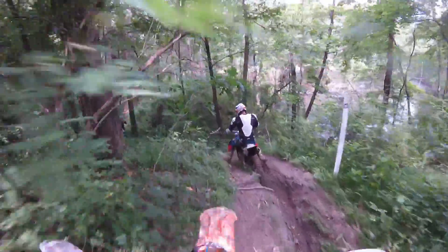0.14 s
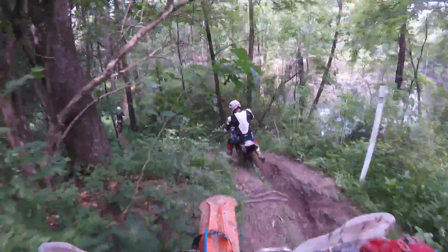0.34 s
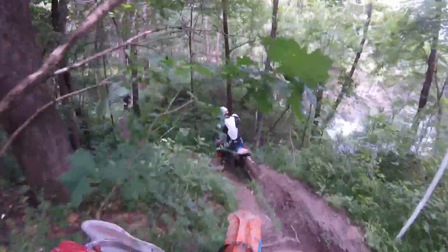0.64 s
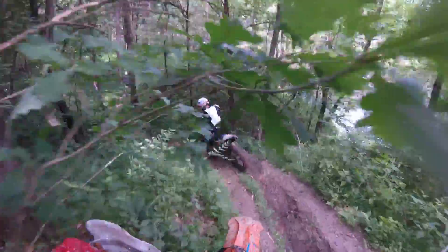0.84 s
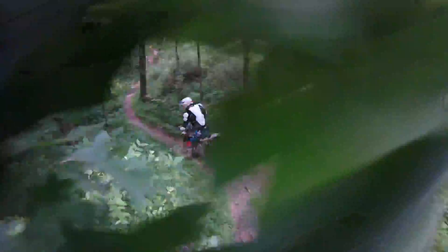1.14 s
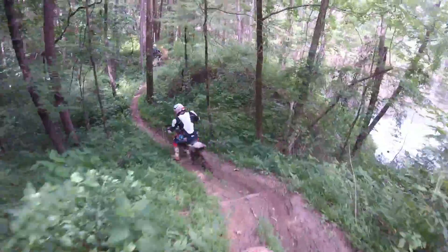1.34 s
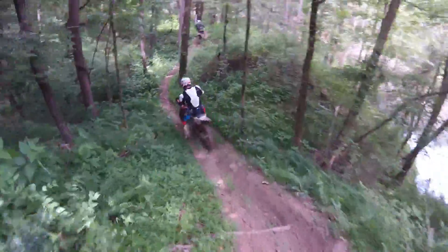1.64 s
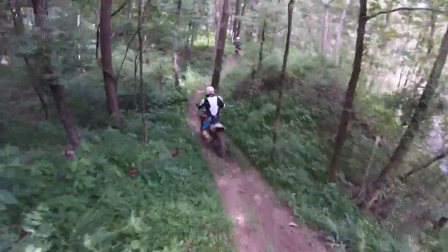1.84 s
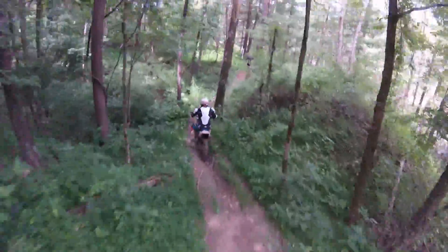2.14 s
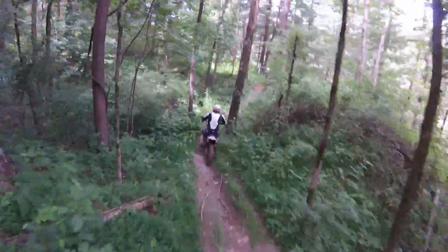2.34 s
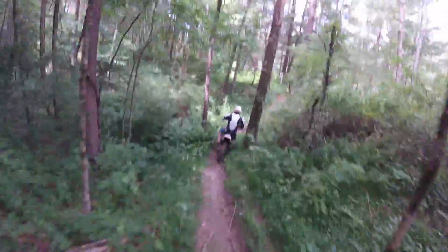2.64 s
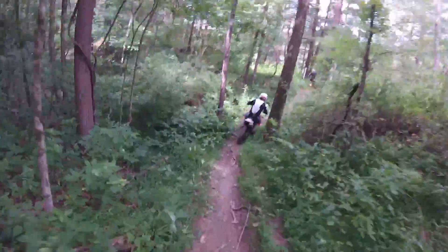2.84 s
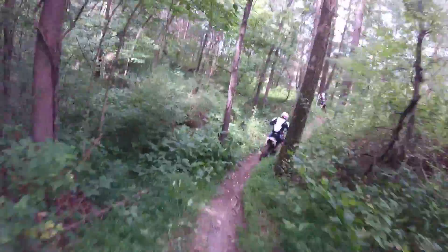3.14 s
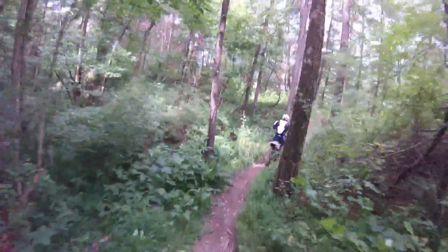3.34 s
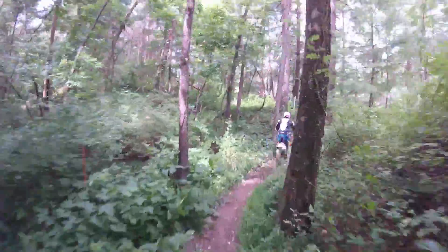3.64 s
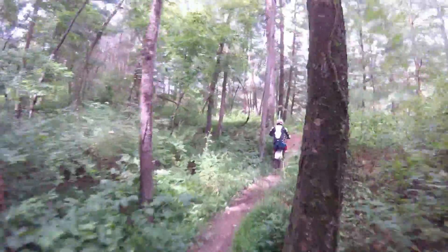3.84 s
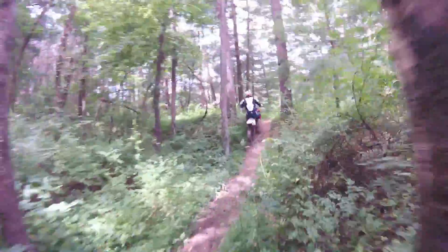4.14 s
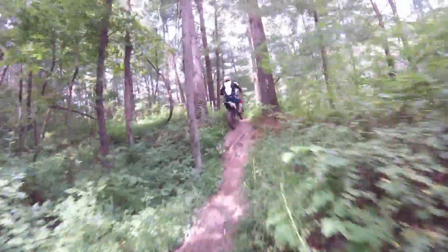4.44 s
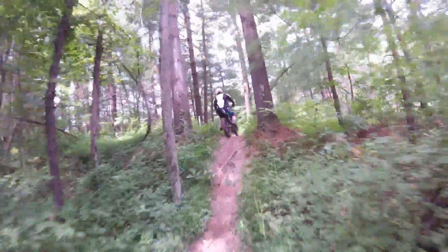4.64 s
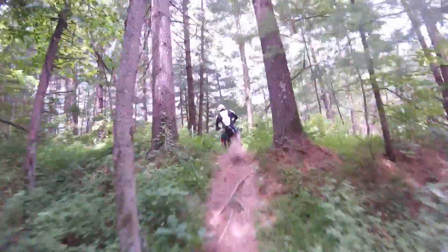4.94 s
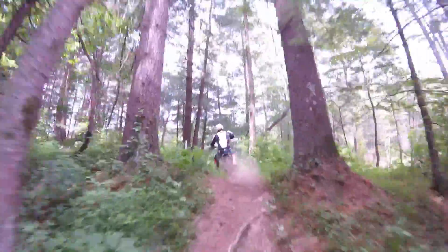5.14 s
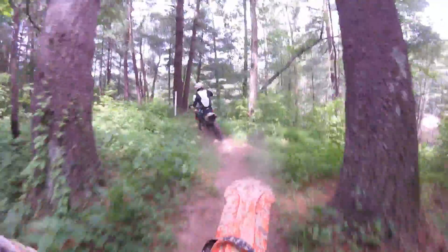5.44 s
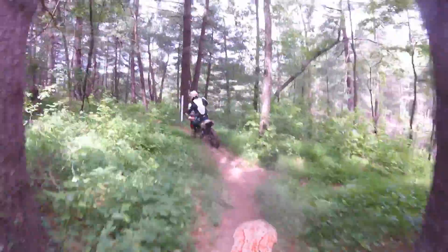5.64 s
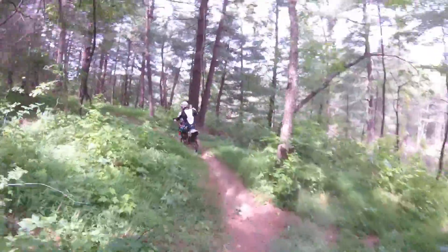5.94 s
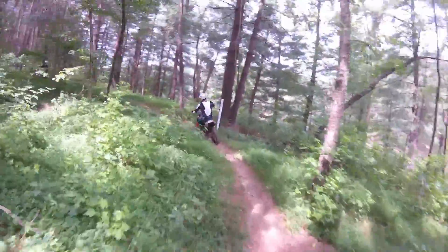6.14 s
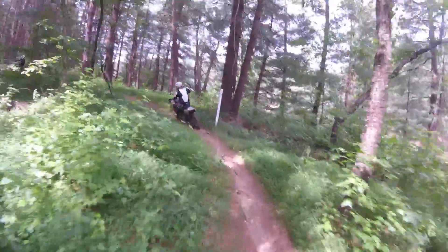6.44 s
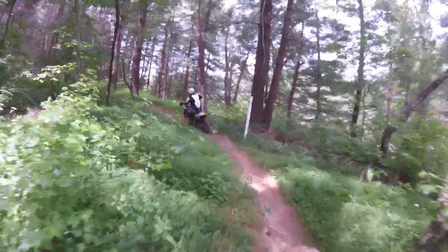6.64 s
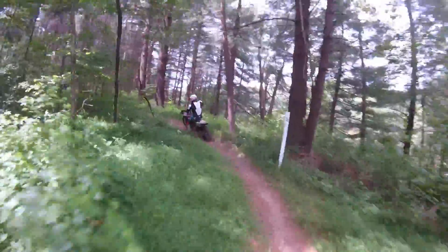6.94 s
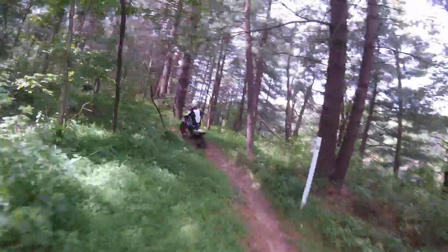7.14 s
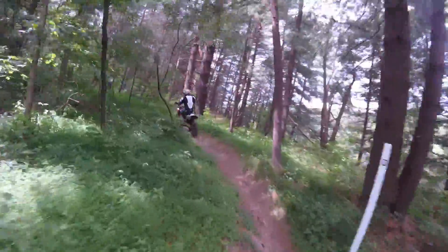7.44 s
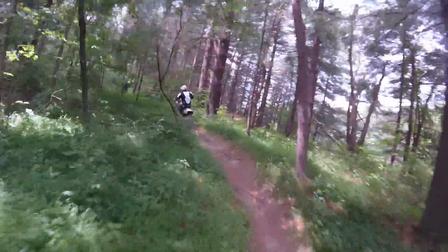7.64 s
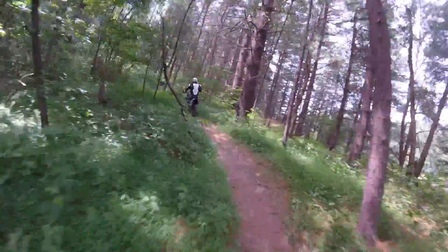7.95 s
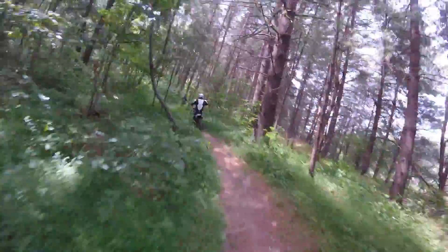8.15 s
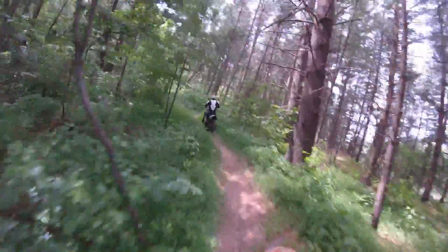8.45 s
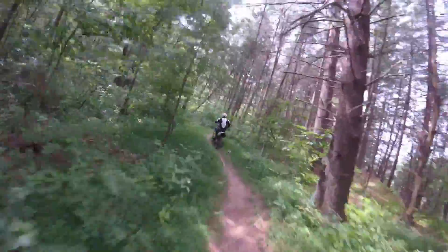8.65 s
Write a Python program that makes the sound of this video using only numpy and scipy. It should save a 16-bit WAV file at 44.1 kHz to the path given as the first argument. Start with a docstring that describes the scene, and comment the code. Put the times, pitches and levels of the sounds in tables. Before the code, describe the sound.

Dirt bikes putter and rev in short bursts while leaves slap a helmet microphone over low wind rumble and thumps.

```python
"""A dirt bike revs in bursts just ahead on a forest trail, its exhaust aimed back at a helmet camera.
Each firing is a pulse coloured by the pipe: it sings on open throttle and putters when coasting.
Close up, the rider's own two-stroke rattles once a turn and pops at idle. Leaves and twigs slap
the helmet and ring the camera's closed housing. Underneath, trail bumps and wind gusts buffet
the helmet with low thumps and shake the housing's membrane at its low resonance."""
import sys
import numpy as np
from scipy import signal
from scipy.fft import rfft, irfft, next_fast_len
from scipy.io import wavfile
from scipy.ndimage import uniform_filter1d, map_coordinates

SR = 44100
rng = np.random.default_rng(int(sys.argv[2]) if len(sys.argv) > 2 else 0)


def log_audio(samples):
    """Write samples as a 16-bit WAV file to the path given in sys.argv[1]."""
    # one column per channel
    frames = np.atleast_2d(samples).T
    # limit to full scale, then quantise
    limited = np.clip(frames, -1, 1)
    pcm = np.round(limited * 32767).astype(np.int16)
    wavfile.write(sys.argv[1], SR, pcm)


N = 387638

# Engine speed of the bike ahead: time_s, turns_per_s
AHEAD_SPEED = [(3.2, 44), (4, 44), (4.1, 48), (4.24, 62.3), (4.3, 65), (4.41, 64.5), (4.56, 52), (4.64, 50),
               (4.72, 54), (4.8, 67), (4.88, 70.8), (4.98, 69.1), (5.07, 63.5), (5.13, 63.4), (5.3, 46),
               (5.62, 48), (5.72, 60.6), (5.8, 69), (5.87, 71), (5.96, 79.3), (6.04, 60), (6.1, 50),
               (6.2, 51), (6.27, 57.2), (6.37, 56.8), (6.52, 65.2), (6.58, 65.7), (6.66, 63.3), (6.76, 58),
               (6.92, 46), (7.05, 55), (7.12, 50), (7.38, 45), (7.5, 58.5), (7.56, 62.6), (7.66, 64.5),
               (7.8, 64), (7.86, 62.4), (8.06, 49.4), (8.19, 52.4), (8.27, 45), (8.55, 63.2), (8.62, 65.3),
               (8.79, 52)]
# Its throttle bursts: open_s, shut_s, opening_0_to_1, level_db, turned_aside_0_to_1
BURSTS = [(3.174, 3.448, 0, -46, 0.02), (3.837, 4.1, 0.53, -33.5, 0.01), (4.35, 4.67, 0.42, -34, 0.18),
          (4.025, 4.359, 0.79, -25, 0), (4.562, 5.133, 1, -29.5, 0.12), (5.515, 5.712, 0.95, -27, 0),
          (5.705, 6.04, 0.78, -31.5, 0.95), (6.057, 6.81, 0.94, -30, 0), (6.827, 7.006, 0.5, -31.5, 0.01),
          (7.29, 7.89, 0.74, -28.5, 0), (7.872, 8.12, 0.7, -30, 0.01), (8.26, 8.58, 0.76, -27, 0.01)]
# Harmonics that sing on open throttle: harmonic, level_db
SINGING_HARMONICS = [(4, -6), (8, -14), (11, -20)]
# Its exhaust head-on, turned aside, as a hollow putter and as a bright rasp: frequency_hz, gain_db
PIPE_EQ = [(50, -44), (130, -13.5), (200, -2), (260, 9), (325, 3.5), (380, -15.5), (450, -13), (520, 0),
           (600, -14), (720, -11), (850, -19), (1050, -13), (1350, -10), (1500, -30), (1700, -24),
           (4000, -120)]
ASIDE_EQ = [(50, -23), (150, 8), (200, -14), (238, 13), (300, -11), (400, 5.5), (500, -1), (700, 3.5),
            (900, -40), (1200, -9.5), (1500, -46), (4000, -120)]
PUTTER_EQ = [(300, -40.5), (520, 3.5), (650, 25.5), (800, -53.5), (1500, -35.5), (4000, -120)]
RASP_EQ = [(700, -14), (1100, -8), (1500, -8), (2000, -1.5), (9000, -2.5)]

# The rider's own engine: time_s, turns_per_s, rattle_db, hum_db
OWN_ENGINE = [(0, 33, -51.5, -58), (1.15, 25, -55, -74), (1.35, 24, -67.5, -99.5), (1.6, 22.6, -68, -80.5),
              (2.2, 33, -56, -61), (2.45, 30, -53, -80), (2.75, 27, -57.5, -65), (3.2, 38, -59.5, -83),
              (3.3, 51, -58.5, -64), (3.4, 58, -52.5, -53), (3.65, 62, -51, -45.5), (3.77, 69, -49.5, -68),
              (3.9, 63, -52.5, -71), (4.6, 52, -45.5, -68), (4.8, 64, -41, -73), (5.16, 56, -47, -65),
              (5.25, 45, -56.5, -73), (5.38, 50, -54.5, -55), (5.45, 54, -51.5, -43.5),
              (5.58, 62.6, -46.5, -34.5), (5.85, 61, -39.5, -30), (6.1, 64, -49.5, -36.5),
              (6.55, 65, -43.5, -32), (6.93, 54, -48.5, -49), (7.02, 62, -44, -37), (7.1, 68, -42, -39),
              (7.2, 72, -42.5, -40), (7.4, 71, -43.5, -64), (7.48, 72, -43, -26), (7.53, 90, -40.5, -39),
              (7.58, 98, -36.5, -52), (7.64, 72, -41, -74), (8.45, 70, -49, -30), (8.67, 65, -46.5, -42.5),
              (8.79, 62, -63, -55)]
# Its exhaust hum: harmonic, level_db
HUM_HARMONICS = [(1, -8), (2, -6), (3, -2), (4, 0), (5, -10), (6, -12), (8, -12), (9, -12), (12, -14)]
# Firings that catch at idle: start_s, level_db
IDLE_POPS = [(0.069, -22), (0.426, -11.5), (0.616, -11), (0.796, -16), (1.443, -31), (1.615, -26),
             (1.778, -26), (1.972, -18), (2.128, -25.5), (2.293, -19), (2.455, -15.5), (2.647, -13),
             (2.83, -23), (2.994, -14.5)]
# Its frame drone and its dull, mid and sizzling rattle: frequency_hz, gain_db
FRAME_EQ = [(60, -29.5), (120, -5), (350, 2.5), (620, -15), (850, -9.5), (1300, -49.5), (3000, -120)]
DULL_EQ = [(600, -21), (1000, -17), (1500, -14), (2000, -15), (2500, -29), (4200, -21), (15000, -20)]
MID_EQ = [(1500, -4.5), (2000, -12)]
SIZZLE_EQ = [(2000, -25), (5000, 16.5), (13000, 15)]

# Leaves and twigs hitting the helmet: start_s, level_db, centre_hz
LEAF_SLAPS = [(0.142, -19, 2590), (0.23, -16.5, 1360), (0.249, 4.5, 2140), (0.278, -32, 2390),
              (0.294, 0, 1560), (0.361, -18, 1310), (0.739, -5.5, 1920), (0.768, -12.5, 2880),
              (0.961, 12.5, 3240), (0.966, -11, 2600), (0.973, -7, 2560), (0.983, -8, 1900),
              (0.991, 3, 2030), (1.05, -9, 1517), (1.056, -1.5, 1830), (1.062, 13.5, 3850),
              (1.069, 3.5, 3640), (1.083, -0.5, 2280), (1.099, -7.5, 2970), (1.11, -26.5, 2590),
              (1.159, -3.5, 5000), (1.168, -5.5, 3720), (1.189, -4, 3320), (1.195, -7, 3240),
              (1.214, 11, 2810), (1.731, -23.5, 1420), (2.014, -17.5, 3480), (2.21, -25.5, 1180),
              (2.266, -0.5, 3180), (2.638, -21, 3000), (2.672, -16, 2730), (2.711, -3, 3300),
              (2.882, -25, 2610), (2.92, -16, 1320), (2.954, -20.5, 1010), (2.993, -19, 2770),
              (3.041, -22.5, 780), (3.064, -22, 1090), (3.08, -7, 2000), (3.091, -21, 1980),
              (3.117, -22.5, 2390), (4.079, -19.5, 960), (5.189, -6, 1540), (5.227, -6, 1670),
              (5.288, -28, 1390), (5.304, -19, 1480), (5.316, -22, 1400), (5.363, -13, 1580),
              (6.116, -1.5, 2870), (7.28, -9, 2880)]
# Leaves dragging along it: start_s, length_s, level_db, centre_hz
LEAF_DRAGS = [(0.225, 0.03, -19.5, 1470), (0.268, 0.029, -21.5, 1900), (0.949, 0.047, -23.5, 2640),
              (1.034, 0.061, -34.5, 2450), (1.1, 0.029, -21, 2900), (1.163, 0.078, -26.5, 3300),
              (1.209, 0.12, -43, 2400), (3.005, 0.045, -34, 2900)]
# Resonances of the struck housing: pitch_hz, width_hz, level_db
SHELL_MODES = [(1206, 81, -0.5), (2040, 1100, -6), (1960, 88, -6), (2450, 250, -0.5), (2900, 820, -7.5),
               (3560, 284, -1), (4080, 87, -6.5), (5020, 280, -8), (5600, 370, -10.5), (7900, 2300, -21),
               (9600, 1600, -28), (12900, 730, -25.5)]
# The housing's boxy colour on bright engine noise, and its thud when hit: frequency_hz, gain_db
HOUSING_EQ = [(500, -4), (950, -8), (1380, -1.5), (1600, -22.5), (2000, -18), (2450, 1), (2900, -3),
              (3450, 1.5), (3950, -15.5), (4550, -19.5), (4890, -9.5), (5300, -19.5), (5850, -16.5),
              (6300, -21), (7700, -24), (9000, -34.5), (9900, -32), (11200, -42), (13000, -37.5),
              (15500, -84)]
THUD_EQ = [(100, 13), (500, 1.5), (1000, -1), (1600, -6.5), (2200, -4.5), (5000, -6), (15500, -28.5)]

# Trail bumps and short wind gusts buffeting the helmet: start_s, thump_db, rumble_swell_db
BUFFETS = [(0.232, -30, -15), (0.549, -55, -1.5), (0.981, -33, -5.5), (1.049, -15, -10), (1.779, -54, -17),
           (2.054, -42, -24), (2.279, -35.5, -13), (2.5, -54, -9), (2.671, -13.5, 2), (2.746, -30, -3.5),
           (3.06, -12.5, 7), (3.748, -52, -9), (4.072, -40, -2.5), (4.338, -10, 4), (4.58, -24, -9),
           (5.09, -18.5, -10.5), (5.214, -11, 2), (5.321, -39, -4.5), (5.805, -40, -42), (6.095, -17.5, -4),
           (6.948, -51, -2), (7.648, -18, -13), (7.888, -21, 0), (8.352, -35, 4), (8.703, -22, 5)]
# Wind on the housing: time_s, level_db
WIND_LEVEL = [(0.0, -20), (0.59, -22.5), (1.15, -29.5), (1.37, -43), (2.32, -26), (2.69, -21), (2.79, -24),
              (3.47, -26.5), (3.89, -23), (4.38, -26), (4.53, -17), (4.87, -30), (5.12, -35), (5.29, -9),
              (5.41, -28), (5.78, -32.5), (6.19, -19.5), (6.39, -40), (6.66, -26), (6.85, -16.5),
              (7.15, -26), (7.69, -23.5), (8.27, -16), (8.79, -23)]
# The low end, from a thump's puff, the membrane and the rushing air: frequency_hz, gain_db
PUFF_EQ = [(60, -13.5), (120, -1), (300, -11), (1200, -30.5), (4000, -120)]
MEMBRANE_EQ = [(8, -30), (20, -7), (30, -4), (39, 0), (47, -6), (60, -17), (100, -65), (200, -120)]
RUSH_EQ = [(40, -21), (72, 6.5), (100, -9.5), (200, -25.5), (500, -29.5), (1500, -120)]

MAX_TURNS = 600  # more than either engine makes


def bike_ahead():
    """One pulse per firing through the pipe; off throttle, alternate turns misfire and the rest scatter."""
    speed, = curves(AHEAD_SPEED)
    throttle, level_db, aside = throttle_bursts()
    level_db = level_db + 0.2431 * throttle * (speed - 62)  # a burst swells with engine speed
    rough = 1 - throttle
    turns = np.cumsum(speed) / SR
    firings = np.flatnonzero(np.diff(np.floor(turns)))
    jitter, spread = rng.standard_normal((MAX_TURNS, 2))[:len(firings)].T
    late = (jitter * rough[firings] * 0.035 * SR / speed[firings]).astype(int)
    misfire = np.arange(len(firings)) % 2 * rough[firings] ** 2
    strength = amp((0.3 + 2.5 * rough[firings]) * spread) * (1 - misfire)
    pulses = np.bincount(np.clip(firings + late, 0, N - 1), strength, N)
    gas = unit(np.exp(-3.5 * (turns % 1)) * noise())  # gas rushes after each firing
    exhaust = crossfade(steady(pulses, 0.19), gas, 0.012 + 0.12 * rough ** 1.5)
    head_on = steady(coloured(exhaust, PIPE_EQ, sudden=0), 0.11)
    off_axis = steady(coloured(exhaust, ASIDE_EQ, sudden=0), 0.11)
    singing = sum(amp(db) * np.cos(2 * np.pi * k * turns) for k, db in SINGING_HARMONICS)
    pipe = crossfade(head_on, off_axis, aside) + throttle ** 2 * (1 - aside) * singing
    putter = rough ** 2 * steady(coloured(pulses, PUTTER_EQ, sudden=0), 0.3)
    rasp = gas + throttle * noise() + 0.5 * steady(pulses, 0.1)
    rasp = steady(housed(rasp, RASP_EQ), 0.6)
    return amp(level_db) * (pipe + amp(-11.5) * rasp + amp(-5) * putter)


def throttle_bursts(open_s=0.14, shut_s=0.19, coast_db=-67, bend_db=-17):
    """Throttle, exhaust level and aim of the bike ahead: every burst opens, holds and shuts alike."""
    t = np.arange(N) / SR
    opens, shuts, opening, burst_db, turned = np.transpose(BURSTS)[:, :, None]
    shapes = ease((t - opens) / open_s) * ease(1 - (t - shuts) / shut_s)
    throttle = np.max(shapes * opening, axis=0)
    round_bend = ease(1 - (t - 3) / open_s)  # until 3 s the exhaust points away round the bend
    level_db = coast_db + bend_db * round_bend + np.max(shapes * (burst_db - coast_db), axis=0)
    aside = np.sum(shapes * turned, axis=0) / (shapes.sum(axis=0) + 0.01)
    return throttle, level_db, aside


def own_bike():
    """Piston slap gates a rattle once a turn, crisper under load, over a frame drone and exhaust hum."""
    speed, rattle_db, hum_db = curves(OWN_ENGINE)
    load = np.clip(0.3 + 0.02 * (speed - 25), 0, 1)
    overrev = np.clip(speed - 73, 0, None)  # free revving is louder and brighter
    turns = np.cumsum(speed * (1 + 0.006 * wobble(25))) / SR
    since_firing_s = turns % 1 / speed
    strength = amp((4 - 3.2 * load) * noise(MAX_TURNS)[turns.astype(int)])
    decay_s = 0.0035 + 0.008 * (1 - load)
    slap = 0.06 + 0.7 * (1 - load) ** 2 + strength * np.exp(-since_firing_s / decay_s)
    tick = 12 * load ** 2 * strength * np.diff(np.floor(turns), prepend=0)
    clatter = slap * noise() + tick / 3
    mid = steady(housed(clatter, MID_EQ), 1)
    sizzle = amp(-36.5 + 1.5 * overrev) * steady(housed(clatter, SIZZLE_EQ), 1)
    dull = (slap + 1.8) * noise() + 2.5 * resonant_twice(tick, 800, 1300)
    dull = steady(housed(dull, DULL_EQ), 1)
    drone = steady(coloured((slap + 1) * noise(), FRAME_EQ), 0.14)
    ring = housing_ring(speed, load, tick, strength, since_firing_s)
    rattle = amp(rattle_db + 0.2 * overrev) * (mid + sizzle + amp(4) * ring)
    rattle += amp(rattle_db + 9.5) * dull + amp(np.minimum(rattle_db + 6, -48)) * drone
    hum = sum(amp(db) * np.sin(2 * np.pi * k * turns + k ** 2) for k, db in HUM_HARMONICS)
    return idle_pops() + amp(1.2 * wobble(30)) * rattle + amp(hum_db) * hum


def housing_ring(speed, load, tick, strength, since_firing_s):
    """Each firing rings the housing's shell, harder under load and higher with speed."""
    climb = np.clip((speed - 52) / 22 + 0.15 * wobble(20), 0, 1)
    knock = tick + strength * load ** 2 * np.exp(-since_firing_s / 0.003) * noise()
    lower = unit(resonant_twice(knock, hz=2800, width_hz=900))
    upper = unit(resonant_twice(knock, hz=3100, width_hz=1000))
    return load ** 2 * steady((1 - climb) * lower + climb * upper, 0.4)


def idle_pops():
    """A firing that catches at idle is a short, round, pitched pop."""
    pops, t = np.zeros(N), np.arange(SR // 10) / SR
    for start_s, db in IDLE_POPS:
        pitch_hz = 365 * (1 + 0.023 * rng.standard_normal())
        envelope = attack(t, rise_s=0.022) * decay(t, t60_s=0.055)
        place(pops, start_s, amp(db) * envelope * np.sin(2 * np.pi * pitch_hz * t))
    return pops


def foliage():
    """Slaps are short cracks and drags are runs of tiny ticks; both thud and ring the housing."""
    hits, t = np.zeros(N), np.arange(SR // 10) / SR
    envelope = decay(t, t60_s=0.011) + 0.05 * decay(t, t60_s=0.06)  # the shell rings on faintly
    for start_s, db, hz in LEAF_SLAPS:
        crack = leaf_tone(envelope * (noise(len(t)) + 3 * (t == 0)), hz)
        place(hits, start_s, amp(db) * crack / np.abs(crack).max())
    for start_s, length_s, db, hz in LEAF_DRAGS:
        n = round(length_s * SR)
        ticks = leaf_tone(amp(5 * wobble(400)[:n]) * noise(n), hz)
        place(hits, start_s, amp(db) * unit(ticks) * np.hanning(n) ** 0.3)
    ring = sum((-1) ** k * amp(db) * resonant(hits, hz, width_hz)
               for k, (hz, width_hz, db) in enumerate(SHELL_MODES))
    return amp(2) * ring + coloured(hits, THUD_EQ)


def leaf_tone(x, hz):
    """A broad peak plus some raw edge; dull hits have less edge."""
    return resonant(x, hz, 0.67 * hz) + 0.1 * (hz / 3000) ** 2 * x


def buffets():
    """Each bump or short gust is a low thump that falls in pitch to 78 Hz, with a puff of noise."""
    thumps, t = np.zeros(N), np.arange(SR // 4) / SR
    for start_s, db, _ in BUFFETS:
        cycles = 78 * (t + 0.0043 * (1 - np.exp(-t / 0.0087)))
        thump = np.sin(2 * np.pi * cycles) * decay(t, t60_s=0.16)
        puff = unit(coloured(noise(N // 32), PUFF_EQ)[:len(t)]) * decay(t, t60_s=0.04)
        place(thumps, start_s, amp(db) * attack(t, rise_s=0.0056) * (thump + 1.6 * puff))
    return thumps


def wind(gusty_db=4, shaky_db=1.5):
    """Wind and bumps swing the membrane near 39 Hz in swells of rumble; a lumpy rush follows them."""
    wind_db, = curves(WIND_LEVEL)
    power = amp(wind_db + gusty_db * wobble(13)) ** 2
    for start_s, _, swell_db in BUFFETS:
        t = np.clip(np.arange(N) / SR - start_s, 0, None)
        power += (amp(swell_db) * attack(t, rise_s=0.023) * decay(t, t60_s=0.27)) ** 2
    swing = steady(coloured(noise(), MEMBRANE_EQ), 0.1)
    rush = unit(amp(4.6 * wobble(12)) * coloured(noise(), RUSH_EQ))
    return np.sqrt(power) * amp(shaky_db * wobble(18)) * swing + amp(-17.5) * power ** 0.46 * rush


def amp(db):
    return 10 ** (np.asarray(db) / 20)


def unit(x):
    return x / np.sqrt(np.mean(x ** 2) + 1e-20)


def noise(n=N):
    return rng.standard_normal(n)


def attack(t, rise_s):
    return 1 - np.exp(-t / rise_s)


def decay(t, t60_s):
    return amp(-60 * t / t60_s)


def ease(u):
    return np.sin(np.pi / 2 * np.clip(u, 0, 1)) ** 2


def crossfade(a, b, share):
    return np.sqrt(1 - share) * a + np.sqrt(share) * b


def place(track, start_s, sound):
    span = track[round(start_s * SR):][:len(sound)]
    span += sound[:len(span)]


def curves(rows):
    """One value per sample for each column after the time."""
    times, *columns = np.transpose(rows)
    return [np.interp(np.arange(N) / SR, times, column) for column in columns]


def wobble(rate):
    """A smooth random curve, rate knots a second."""
    return map_coordinates(noise(int(N * rate / SR) + 4), [np.arange(N) * rate / SR])


def steady(x, seconds):
    """x with its running level evened out to rms 1."""
    return x / np.sqrt(np.abs(uniform_filter1d(x ** 2, int(seconds * SR))) + 1e-12)


def resonant(x, hz, width_hz):
    return signal.lfilter(*signal.iirpeak(hz, hz / width_hz, SR), x)


def resonant_twice(x, hz, width_hz):
    return resonant(resonant(x, hz, width_hz), hz, width_hz)


def coloured(x, eq, sudden=1):
    """x through an EQ curve; a pulse starts at once (sudden 1) or swells and fades evenly (0)."""
    size = 2 * next_fast_len(len(x) // 2 + 8192)
    hz, db = np.transpose(eq)
    gain_db = np.interp(np.log(np.fft.rfftfreq(size, 1 / SR) + 1), np.log(hz + 1), db)
    cepstrum = irfft(np.log(amp(gain_db) + 1e-6), size)
    cepstrum[1:size // 2] *= 2  # fold to minimum phase
    cepstrum[size // 2 + 1:] = 0
    response = rfft(cepstrum)
    return irfft(rfft(x, size) * np.exp(response.real + sudden * 1j * response.imag), size)[:len(x)]


def housed(x, eq):
    """x through the closed housing, then its own EQ."""
    return coloured(coloured(x, HOUSING_EQ), eq)


def scene():
    """Both bikes, the trail and the wind, in mono."""
    return (bike_ahead() + own_bike() + foliage() + buffets() + wind())[None]


def record(dry):
    """The input stage saturates near full scale and keeps nothing above its band limit."""
    top_hz, pad = 15800, 4096
    saturated = dry / (1 + np.abs(dry) ** 6) ** (1 / 6)
    padded = np.pad(saturated, ((0, 0), (pad, pad)), "reflect")
    size = next_fast_len(padded.shape[1])
    passband = np.fft.rfftfreq(size, 1 / SR) < top_hz
    return irfft(rfft(padded, size) * passband, size)[:, pad:pad + N]


dry = scene()
out = record(dry)
log_audio(out)
```